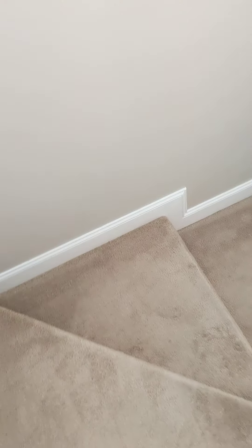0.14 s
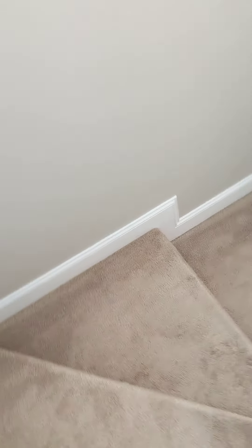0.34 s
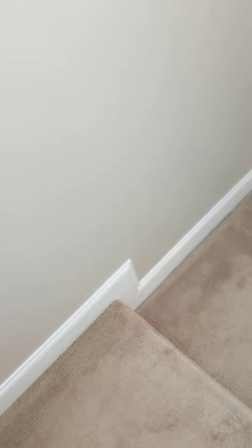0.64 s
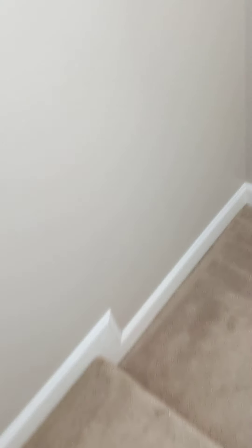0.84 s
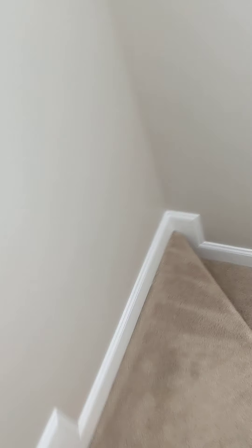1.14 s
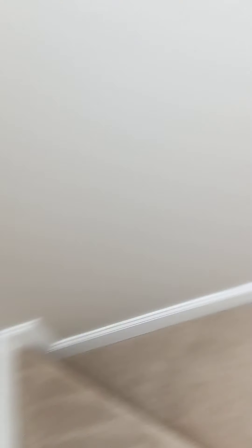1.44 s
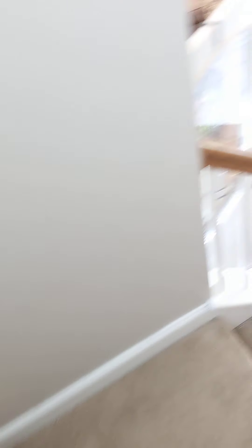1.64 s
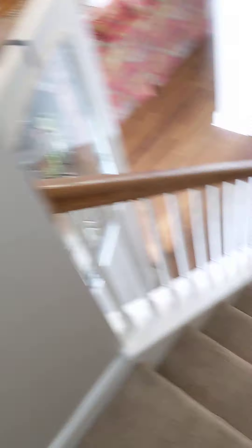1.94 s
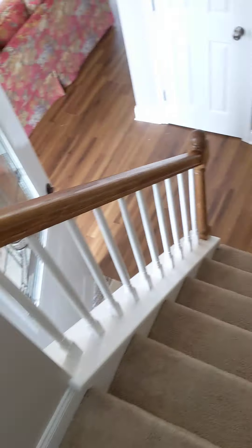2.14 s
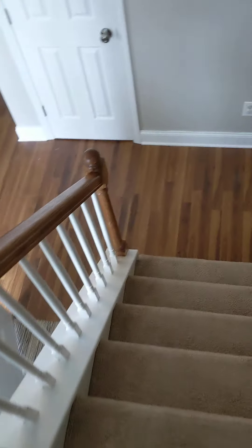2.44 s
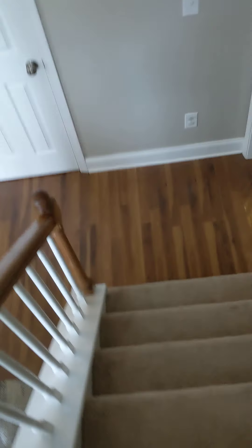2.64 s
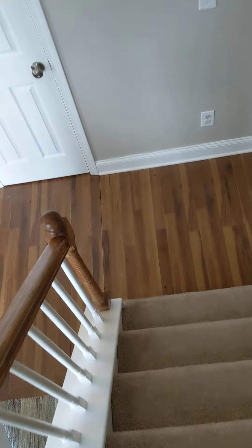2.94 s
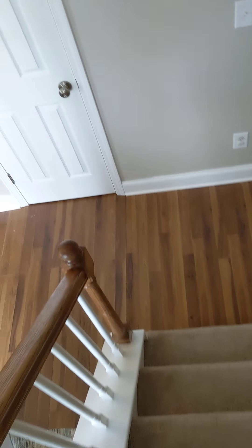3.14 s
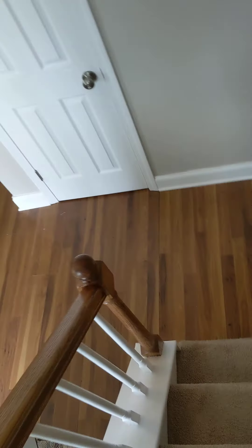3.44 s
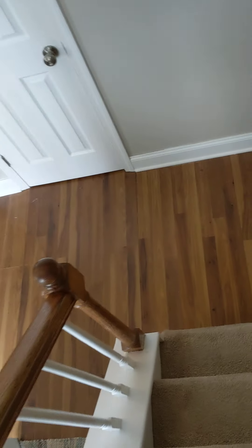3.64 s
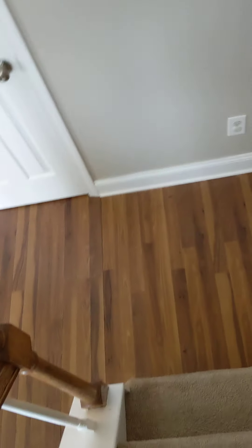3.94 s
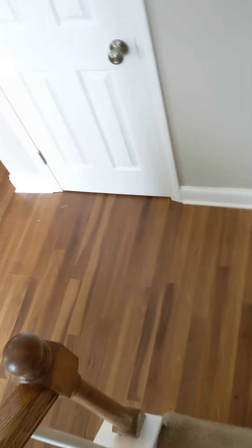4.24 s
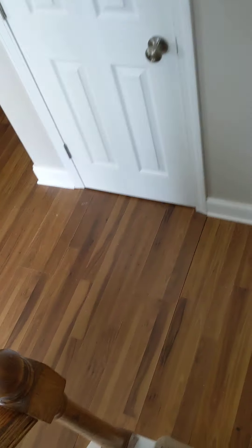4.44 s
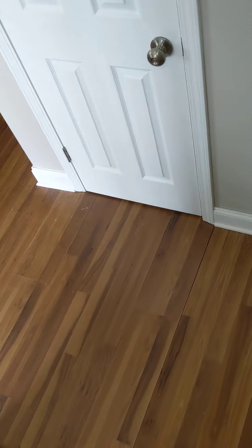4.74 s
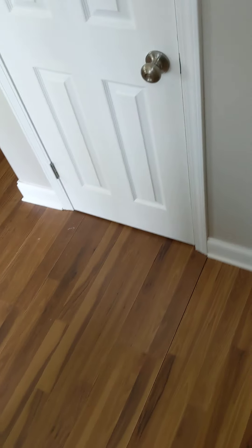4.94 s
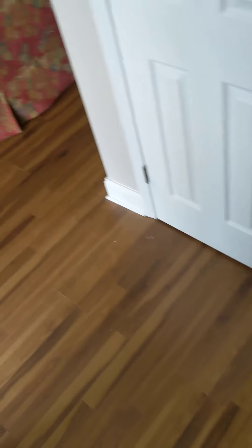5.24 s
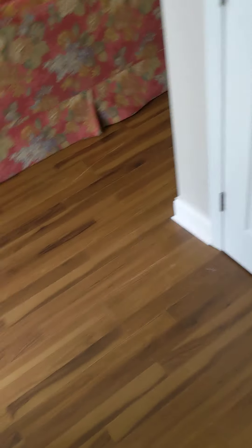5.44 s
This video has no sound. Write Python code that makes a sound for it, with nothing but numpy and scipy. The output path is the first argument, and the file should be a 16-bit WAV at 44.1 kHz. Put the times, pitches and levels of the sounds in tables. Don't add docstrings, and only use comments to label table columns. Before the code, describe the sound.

Uneven padded footfalls on a carpeted staircase, heard close from a small handheld stereo recorder. Low thuds shake the wooden frame while boards knock, rattle, tick and crack; feet crunch and brush the pile and trouser legs hiss past each other. The strongest step lands around 1.5 seconds, quieter ones follow, one bright crack interrupts, and a deeper thud comes last. Faint house hush and brief echoes from close walls.

```python
import sys
import numpy as np
from scipy import signal
from scipy.fft import rfft, irfft, next_fast_len
from scipy.io import wavfile

SR = 44100
rng = np.random.default_rng(int(sys.argv[2]) if len(sys.argv) > 2 else 0)


def natural_amplitude(level_db):
    exponent = np.asarray(level_db, float) / 20
    return 10 ** exponent


def store_pcm(level_fs):
    pcm = np.round(np.clip(level_fs, -1, 1) * 32767).astype(np.int16)
    wavfile.write(sys.argv[1], SR, np.atleast_2d(pcm).T)


N = 246735
PAD = next_fast_len(N + SR)
HZ = np.maximum(np.fft.rfftfreq(PAD, 1 / SR), 1)
PORTS_APART_HZ = 304
LEFT_LAG_S = 0.00018


def rms_one(x):
    return x / np.sqrt(np.mean(x ** 2) + 1e-20)


def peak_one(x):
    return x / np.max(np.abs(x))


def add(track, start_s, sound):
    at = round(start_s * SR)
    track[..., at:at + sound.shape[-1]] += sound[..., :N - at]


def panned(x, pan_db):
    return x * natural_amplitude([[pan_db / 2], [-pan_db / 2]])


def in_time(rows, peak_db, rise_db_s, fall_db_s):
    t = np.arange(N) / SR
    start, hold = np.transpose(rows)[:2, :, None]
    swell_db = rise_db_s * np.maximum(start - t, 0)
    decay_db = fall_db_s * np.maximum(t - start - hold, 0)
    return natural_amplitude(peak_db[:, None] - swell_db - decay_db)


def at_hz(points, hz):
    table_hz, table_db = np.transpose(points)
    return np.interp(np.log(hz), np.log(table_hz), table_db)


def colour(x, gain):
    return irfft(rfft(x, PAD) * gain, PAD)[..., :N]


def band_of(x, order, edges_hz):
    return signal.sosfilt(signal.butter(order, edges_hz, "band", fs=SR, output="sos"), x)


def drift(rate):
    knots = rng.standard_normal(int(N / SR * 200) + 2)
    return np.interp(np.arange(N) / SR * rate, np.arange(len(knots)), knots)


def resonance(x, hz, t60):
    shrink = natural_amplitude(-60 / (t60 * SR))
    turn = 2 * np.pi * hz / SR
    return signal.lfilter([0, np.sin(turn)], [1, -2 * shrink * np.cos(turn), shrink * shrink], x)


def ports(mid, side):
    apart = HZ ** 1.3397 / (HZ ** 1.332 + PORTS_APART_HZ ** 1.443) + 0.15
    side = colour(side, apart)
    return np.array([mid + side, mid - side])


def grainy(spectrum, per_s, spread_db, patchy_db):
    sizes = natural_amplitude(spread_db * np.minimum(rng.exponential(1, (2, N)), 5)) * rng.choice([-1, 1], (2, N))
    happens = rng.random((2, N)) < per_s / SR
    flicker = natural_amplitude(patchy_db * (drift(25) + drift(70)))
    mid, side = colour(sizes * happens * flicker, natural_amplitude(at_hz(spectrum, HZ)))
    return ports(rms_one(mid), rms_one(side))


# t60/s, level over the late tail/dB
EARLY_ECHOES = (0.17, 4.3)


def stairwell(x, noise, t60):
    t = np.arange(noise.shape[-1]) / SR
    early_t60, early_db = EARLY_ECHOES
    dying = natural_amplitude(-60 * t / t60) + natural_amplitude(early_db - 60 * t / early_t60)
    echoes = noise * np.abs(noise) * np.clip(t / 0.003, 0, 1) * dying
    return signal.fftconvolve(echoes / np.sqrt(np.sum(echoes[0] ** 2)), x[None])


def slips(count):
    t = np.arange(SR // 30) / SR
    rough = rng.standard_normal((count, len(t))) * np.exp(-t / 0.0016)
    return (t == 0) + rough, rng.standard_normal((count, 2, SR // 3))


def padded_blows(rows, pan_db):
    near, far = np.zeros((2, N)), np.zeros((2, N))
    t = np.arange(SR // 2) / SR
    delay_s = 0.002
    blow = np.exp(-t / 0.0001)
    for (start, db, hz, rattle_db), noise in zip(rows, rng.standard_normal((len(rows), 2, len(t)))):
        body = resonance(blow, hz, 17.0 / hz) - 0.45 * resonance(blow, 2.2 * hz, 4.0 / hz)
        add(near, start + delay_s, panned(natural_amplitude(db) * peak_one(body), pan_db))
        broad = rms_one(band_of(noise, 3, [0.5 * hz, 1.87 * hz]))
        t60 = 0.31 * (300 / hz) ** 0.45 * natural_amplitude(0.017 * (db + 38))
        dying = np.clip(t / 0.008, 0, 1) * natural_amplitude(-60 * t / np.clip(t60, 0.03, 0.8))
        add(far, start + delay_s, natural_amplitude(db + rattle_db) * broad * dying)
    return near, far


def brief_rings(rows):
    out = np.zeros(N)
    for start, db, hz, cycles in rows:
        t60 = cycles / hz
        push = signal.unit_impulse(int(t60 * SR))
        add(out, start, natural_amplitude(db) * peak_one(resonance(push, hz, t60)))
    return panned(out, 1.5)


# f/Hz, level/dB
HOUSE_COLOUR = [(12, -53), (20, 20), (45, -18), (168, -4.5), (388, -18.5), (472, -7), (849, -13.5),
                (1860, -22.5), (5530, -22.5), (6540, -28), (7520, -23), (8410, -33), (16000, -76)]


def quiet_house():
    return natural_amplitude(-60.5) * grainy(HOUSE_COLOUR, per_s=40000, spread_db=-1.0, patchy_db=1.5)


# f/Hz, level/dB
RUMBLE_COLOUR = [(15, 11), (30, 3), (45, 6.5), (65, -6.5), (100, -10), (150, -51), (260, -46.5)]
# f/Hz, level/dB
CRUNCH_COLOUR = [(71, -7.5), (120, 1), (179, -15.5), (264, -5.5), (372, -13.5), (423, -8), (735, -11.5),
                 (867, -13.5), (2000, -25.5), (2600, -101), (4400, -120)]
# f/Hz, level/dB
RUSTLE_COLOUR = [(710, -3.5), (1200, -6), (1640, -6), (3030, -1.5), (3430, -1), (4290, -6.5), (4810, -8),
                 (5480, -8.5), (7500, -11), (9750, -30), (16500, -120)]
# t/s, hold/s, crunch level/dB, rustle over crunch/dB
FOOT_ROLLS = [(0.0, 0.014, -49, -6), (0.243, 0.019, -47, -3), (0.416, 0.028, -57, 0),
              (0.591, 0.036, -43.5, -8), (1.015, 0.074, -45.5, -10), (1.264, 0.033, -62, -10),
              (1.537, 0.056, -38.5, -10), (1.916, 0.14, -46.5, -10.5), (2.14, 0.19, -62.5, -15),
              (2.624, 0.15, -53, -8), (2.914, 0.07, -68, 3.5), (3.24, 0.19, -55.5, -4.5),
              (3.674, 0.12, -61, -7), (3.867, 0.07, -54, -4.5), (4.08, 0.14, -58, -7),
              (4.383, 0.12, -52, -1.5), (4.647, 0.24, -71.5, 4), (4.942, 0.097, -52, -1.5),
              (5.146, 0.09, -56.5, -1.5), (5.411, 0.053, -46.5, -12)]


def rolling_feet():
    _, _, crunch_db, over_db = np.transpose(FOOT_ROLLS)
    rise_db_s, fall_db_s = 179, 157
    late = np.add(FOOT_ROLLS, [0.0073, 0, 0, 0])
    load = in_time(late, -50.5 + crunch_db - crunch_db.mean(), 350, 70).sum(0)
    crush = in_time(FOOT_ROLLS, crunch_db, rise_db_s, fall_db_s).sum(0) + natural_amplitude(-76)
    brush = in_time(FOOT_ROLLS, crunch_db + over_db, rise_db_s, fall_db_s).sum(0) + natural_amplitude(-71.5)
    rumble = load * grainy(RUMBLE_COLOUR, per_s=1500, spread_db=1.5, patchy_db=1.0)
    crunch = natural_amplitude(-3) * crush * grainy(CRUNCH_COLOUR, per_s=1500, spread_db=2.5, patchy_db=1.0)
    rustle = natural_amplitude(-4) * brush * grainy(RUSTLE_COLOUR, per_s=14000, spread_db=-4.0, patchy_db=1.5)
    return rumble + crunch + panned(rustle, 3)


# f/Hz, level/dB
SWISH_COLOUR = [(3530, -1.5), (6000, 5), (9500, 1.5), (10600, 2.5), (11500, -0.5), (13200, 4.5), (15000, 7),
                (16500, 5.5)]
# t/s, hold/s, level/dB, left over right/dB
LEG_SWINGS = [(0.0, 0.015, -61, -2), (0.232, 0.17, -57, 2), (0.572, 0.17, -54, 1), (0.99, 0.1, -63, 3),
              (1.49, 0.02, -64, 2), (1.58, 0.07, -61.5, 2), (1.858, 0.13, -67, -1), (2.584, 0.12, -64.5, 1),
              (2.842, 0.16, -65, 0), (3.184, 0.41, -68, 0), (3.866, 0.078, -58.5, 0),
              (4.075, 0.2, -63, 3.5), (4.358, 0.17, -54, 3.5), (4.79, 0.06, -66, 5), (4.88, 0.03, -64, 4),
              (4.28, 0.04, -67, 3.5), (2.21, 0.03, -71, 1), (4.95, 0.11, -54, 4), (5.117, 0.072, -63.5, 2),
              (5.332, 0.3, -63.5, 3)]


def trouser_swish():
    _, _, swish_db, pan_db = np.transpose(LEG_SWINGS)
    swing = natural_amplitude([pan_db / 2, -pan_db / 2]) @ in_time(LEG_SWINGS, swish_db, 179, 132)
    resting = natural_amplitude(-74.2)
    return (swing + resting) * grainy(SWISH_COLOUR, per_s=30000, spread_db=3.5, patchy_db=0.5)


# t/s, level/dB, f/Hz, echo share/dB
WOOD_CRACKS = [(0.015, -31, 980, -9), (0.0294, -31, 940, -24), (0.0597, -31.5, 1290, -12),
               (0.3782, -42.5, 1280, 4), (0.4638, -43.5, 1700, 1.5), (0.7026, -35.5, 830, -7),
               (0.8074, -36, 950, -14), (0.835, -29, 915, -31), (0.9305, -37, 970, 3),
               (0.9469, -34.5, 1190, 0.5), (1.0164, -42, 1080, 1), (1.1217, -54, 1000, -7),
               (1.4704, -44, 880, 3), (1.5205, -36, 1190, -6), (1.5598, -31, 870, 2.5),
               (1.965, -38, 920, -15), (1.9824, -52, 934, -15), (2.0228, -37.5, 1100, 1),
               (2.3, -56, 1040, 0), (3.2325, -47, 1380, 0), (3.308, -33, 1220, -7.5),
               (3.333, -28.5, 1600, -7), (3.3416, -36, 2360, -12), (3.3913, -41, 1460, -14),
               (3.6757, -50, 1020, -5), (3.7203, -49.5, 1150, -2), (3.8806, -43.5, 1290, 0.5),
               (3.95, -49, 900, -4), (4.2081, -49, 960, -2), (4.374, -42.5, 850, -2),
               (2.4294, -50.5, 660, -24),
    (2.296, -47.5, 1600, 7.5),
    (1, -53, 3800, -7),
    (3.263, -48, 2500, -8),
    (2.965, -50, 1570, 5.5),
    (0.015, -38, 1560, -5),
    (3.7293, -44.5, 9750, -10),
]


def wood_cracks():
    near, far = np.zeros((2, N)), np.zeros((2, N))
    rows = WOOD_CRACKS
    for (start, db, hz, echo_db), slip, noise in zip(rows, *slips(len(rows))):
        ring = resonance(np.diff(slip, prepend=0), hz, 10.5 / hz)
        wood = natural_amplitude(db) * peak_one(resonance(ring, 1.2 * hz, 2.2 / hz))
        add(near, start, panned(wood, -2.7))
        add(far, start, natural_amplitude(echo_db) * stairwell(wood, noise, t60=0.45))
    return near, far


# t/s, level/dB, f/Hz, rattle/dB
TOE_TAPS = [(0.014, -29.5, 620, -13.5), (0.029, -41, 870, -18), (0.056, -40.5, 620, -11),
            (0.284, -38.5, 700, -12), (0.385, -51, 1200, -3), (0.699, -63, 905, -25),
            (0.803, -41.5, 774, -1.5), (0.836, -34, 780, -4), (0.929, -35, 1000, -7.5),
            (1.116, -42, 614, -2), (1.224, -25.5, 613, -34), (1.227, -34.5, 416, -3),
            (1.373, -44.5, 550, -9), (1.878, -27.5, 387, -9.5), (2.023, -26, 398, -5.5),
            (2.299, -47, 584, -11.5), (2.429, -50.5, 477, -29), (2.963, -47.5, 587, -8.5),
            (3.33, -31.5, 493, -14), (3.419, -38.5, 466, -10.5), (3.95, -45, 940, -34),
            (4.134, -42, 640, -21), (4.203, -59, 473, -3), (4.411, -34, 500, -19), (4.53, -44, 553, -14),
            (4.664, -45.5, 466, -13), (5, -46, 435, -2), (5.149, -47, 560, -4), (5.506, -41, 557, -6)]


def toe_taps():
    return padded_blows(TOE_TAPS, pan_db=-6)


# f/Hz, level/dB
FIBRE_MODES = [(2900, -4), (4150, 4.5), (5550, -4), (9200, -18)]
# t/s, level/dB, echo share/dB
FIBRE_SNAPS = [(0.0295, -39, -2), (0.0615, -46, 7.5), (0.4647, -44, -3), (0.7027, -64, -10),
               (0.806, -46, 5), (0.8376, -34, 0), (0.9317, -24, 2.5), (0.95, -38, -1), (1.0177, -38, 6),
               (1.121, -37.5, 11), (1.225, -54.5, 17.5), (1.374, -41, 11.5), (1.5607, -51, 17),
               (1.9344, -57, 1), (1.966, -37.5, 5), (1.983, -39.5, 1), (2.024, -53, -9), (2.55, -59.5, 17),
               (2.9617, -61, 20), (3.2334, -51.5, 11), (3.263, -53, 12), (3.3095, -45.5, 7),
               (3.333, -30, 2), (3.7215, -53, 9), (3.8804, -48, 13.5), (3.342, -34, -5), (3.351, -42, -9),
               (1.521, -43, -6), (5.149, -44, 7.5), (5.5058, -49.5, 18.5)]


def fibre_snaps():
    near, far = np.zeros((2, N)), np.zeros((2, N))
    dull = peak_one(band_of(signal.unit_impulse(SR // 30), 4, [2200, 6200]))
    for (start, db, echo_db), slip, noise in zip(FIBRE_SNAPS, *slips(len(FIBRE_SNAPS))):
        rung = sum(natural_amplitude(mode_db) * resonance(slip, hz, 0.0041) for hz, mode_db in FIBRE_MODES)
        bright = band_of(slip, 2, [2000, 7500]) + 0.14 * np.diff(slip, prepend=0)
        snap = peak_one(peak_one(bright) + 0.76 * peak_one(rung))
        add(near, start, panned(natural_amplitude(db) * snap, 6))
        add(far, start, natural_amplitude(db + echo_db) * stairwell(dull, noise, t60=0.37))
    return near, far


# t/s, level/dB, f/Hz,
# ring/cycles
TREAD_JERKS = [(1.569, -34, 258, 9), (1.578, -26, 297, 13), (1.593, -31.5, 418, 6.4), (1.614, -36, 345, 8),
               (1.885, -30.5, 330, 5.3), (1.899, -30.5, 344, 8), (1.924, -35, 330, 8.7),
               (1.969, -34, 380, 6.8), (1.996, -31.5, 330, 8), (2.031, -28, 440, 7), (2.053, -29, 477, 11),
               (2.074, -31, 400, 9), (2.094, -33, 444, 10), (2.107, -36.5, 434, 13), (2.131, -39, 398, 10),
               (2.155, -42, 500, 11), (3.44, -43, 550, 8.3), (3.457, -43, 610, 5.2), (0.599, -33, 390, 9),
               (0.613, -32, 380, 11), (1.04, -40, 304, 6.9), (1.252, -42, 500, 10), (5.151, -39.5, 541, 40),
               (5.437, -42, 250, 5.5), (5.448, -30, 63, 4.5), (5.531, -35, 44.7, 5), (5.31, -45, 665, 28),
               (5.335, -46, 730, 27), (0.137, -50, 640, 35), (0.052, -41.5, 604, 30),
               (0.232, -35.5, 39.6, 3.2), (0.269, -37.5, 60, 6), (0.322, -40, 35, 4), (2.687, -36, 36, 5),
               (3.244, -37, 330, 10), (3.342, -37, 520, 7), (2.69, -48, 280, 16), (2.592, -44, 90, 3),
               (0.29, -43, 180, 20), (0.78, -50, 200, 12), (2.03, -33, 142, 13), (1.93, -36, 150, 10),
               (0.845, -37, 566, 28), (4.362, -36.5, 171, 5.5), (4.965, -40, 60, 5), (2.305, -50, 580, 15),
               (2.97, -54, 570, 22)]


def tread_jerks():
    return brief_rings(TREAD_JERKS)


# t/s, level/dB, f/Hz, ring/cycles
DRY_CLICKS = [(0.3772, -32, 1060, 5.8), (0.448, -41, 1800, 4), (1.472, -33, 720, 3.9),
              (1.5215, -26, 900, 4), (1.8785, -34, 1200, 4), (1.944, -48, 1400, 3), (2.026, -28, 1900, 4.4),
              (2.048, -35, 2300, 8), (2.285, -44, 1500, 3.7), (2.32, -53, 1300, 4.4),
              (3.233, -38, 1200, 5.3), (3.2635, -39, 2200, 3), (3.351, -40, 3500, 8),
              (3.951, -35, 770, 3.5), (4.055, -45, 1500, 4.4), (4.21, -46, 680, 3), (0.8365, -32, 4200, 9),
              (1.121, -44, 4000, 4), (0.9325, -26, 8200, 24), (0.9325, -22, 3000, 9),
              (0.933, -30, 4500, 16), (0.838, -38, 5400, 14), (0.098, -44, 1200, 6.2),
              (0.16, -45, 1500, 16), (5.21, -54, 10500, 10), (3.677, -45, 1000, 4), (2.6, -42, 1400, 4),
              (3.3335, -28, 2700, 10), (1.578, -32, 850, 8), (1.595, -31, 890, 8.7), (5.004, -40, 1140, 8),
              (1.54, -41, 2600, 6), (1.5625, -38, 3300, 6), (1.573, -38, 2300, 5), (1.58, -38, 2650, 7),
              (1.591, -40, 2200, 5), (1.597, -41, 3200, 6), (1.617, -40, 1500, 8), (2.027, -38, 2400, 5),
              (2.043, -42, 3300, 6), (2.094, -42, 1400, 5), (0.8065, -39, 4000, 12), (0.612, -44, 3300, 6),
              (3.265, -44, 1200, 4), (3.366, -45, 1600, 8)]


def dry_clicks():
    return brief_rings(DRY_CLICKS)


# t/s, level/dB, f/Hz, rise/ms, ring t60/s
FOOT_THUMPS = [(0.163, -35, 92, 9.4, 0.4), (0.519, -32, 83, 12, 0.42), (0.938, -37, 74, 7, 0.13),
               (0.661, -39, 32, 20, 0.44), (1.022, -29.5, 50, 14, 0.15), (1.232, -42.5, 92, 16, 0.57),
               (1.5035, -16, 54, 10, 0.34), (1.612, -30.5, 33, 12, 0.72), (1.883, -34.5, 90, 12, 0.2),
               (2.02, -29.5, 77, 12.7, 0.26), (2.43, -54, 77, 5.5, 0.16), (2.55, -49, 87.4, 7.9, 0.3),
               (2.61, -40, 43, 29, 0.3), (2.735, -43, 24, 12, 0.66), (3.189, -43, 48, 7.6, 0.19),
               (3.241, -33.5, 53, 16, 0.33), (3.559, -48, 55.6, 13, 0.65), (3.79, -45, 72, 11, 0.43),
               (4.322, -36, 51, 5.4, 0.48), (4.436, -38.5, 42, 7.7, 0.094), (4.906, -38.5, 78.3, 16, 0.56),
               (4.95, -43, 31, 17, 0.24), (5.131, -47.5, 68, 18, 0.15), (5.389, -25, 64, 13, 0.25)]


def foot_thumps():
    out = np.zeros(N)
    t = np.arange(SR // 2) / SR
    shudders = rng.standard_normal((len(FOOT_THUMPS), len(t)))
    for (start, db, hz, rise_ms, t60), shudder in zip(FOOT_THUMPS, shudders):
        envelope = (1 - np.exp(-(t / (rise_ms / 1000)) ** 2)) * natural_amplitude(-60 * t / t60)
        joists = rms_one(resonance(resonance(shudder, 1.8 * hz, 0.024), 1.8 * hz, 0.024))
        frame = np.sin(2 * np.pi * hz * t)
        add(out, start, natural_amplitude(db) * peak_one(envelope * (frame + 0.28 * joists)))
    return out


# t/s, level/dB, f/Hz, rattle/dB
BOARD_KNOCKS = [(0.171, -43.5, 202, -8), (0.23, -41, 186, -6.5), (0.526, -25, 292, -12),
                (0.574, -38, 308, -4), (0.944, -41.5, 134, -15.5), (1.012, -41, 202, -6),
                (1.464, -43.5, 220, 3), (1.524, -28, 277, -5.5), (1.559, -22, 258, -8),
                (1.608, -26, 295, -44), (1.94, -38.5, 326, 3.5), (2.432, -57, 195, -13),
                (2.546, -47, 213, -19), (3.197, -40, 120, -13), (3.234, -33, 339, -14.5),
                (3.805, -45.5, 216, -3), (3.882, -39, 243, -8.5), (4.112, -41.5, 227, -10),
                (4.359, -35.5, 223, -9), (4.528, -47, 217, -9), (4.666, -46, 248, -16),
                (4.903, -41, 125.4, -5), (4.907, -52.5, 240, -13), (5.397, -37.5, 133, -7.5),
                (5.403, -29, 209, -13)]


def board_knocks():
    return padded_blows(BOARD_KNOCKS, pan_db=0.5)


# t/s, hold/s, level/dB, f/Hz, width/octaves
PILE_SCUFFS = [(1.121, 0.04, -52.5, 3600, 1.45), (0.94, 0.026, -52, 3600, 1.2),
               (0.94, 0.02, -53, 4900, 0.97), (0.845, 0.013, -50, 3150, 0.57),
               (4.79, 0.48, -60.5, 3700, 0.6), (1.525, 0.075, -46.5, 870, 0.83),
               (1.62, 0.07, -60, 900, 0.57), (5.26, 0.13, -59, 734, 1.06), (1.9, 0.15, -67.5, 6300, 1.3),
               (1.375, 0.025, -60.5, 1360, 0.7), (0.35, 0.072, -59, 3200, 0.35),
               (2.026, 0.05, -57, 2200, 0.8), (5.3, 0.08, -62, 3600, 1.8), (5.27, 0.17, -61.5, 3300, 0.5),
               (2.2, 0.04, -70, 6000, 1.0), (1.562, 0.05, -55, 2700, 0.9), (1.374, 0.06, -62, 10500, 1.15),
               (2.552, 0.04, -69, 10000, 1.2), (2.01, 0.04, -70, 12500, 0.6)]


def pile_scuffs():
    out = np.zeros((2, N))
    grains = rng.standard_normal((len(PILE_SCUFFS), 2, SR)) ** 3
    gains = in_time(PILE_SCUFFS, np.transpose(PILE_SCUFFS)[2], 1500, 450)
    for (start, _, _, hz, octaves), grain, gain in zip(PILE_SCUFFS, grains, gains):
        edges_hz = hz * 2 ** (octaves * np.array([-0.5, 0.5]))
        rasp = rms_one(band_of(grain, 4, edges_hz))
        begin = start - 0.05
        loudness = gain[round(begin * SR):][:SR]
        add(out, begin, rasp[:, :len(loudness)] * loudness)
    return out


def scene():
    house, feet, swish = quiet_house(), rolling_feet(), trouser_swish()
    crack, crack_far = wood_cracks()
    tap, tap_far = toe_taps()
    snap, snap_far = fibre_snaps()
    rings = tread_jerks() + dry_clicks()
    thump = foot_thumps()
    knock, knock_far = board_knocks()
    echoes = ports(*(crack_far + tap_far + snap_far + knock_far))
    below = house + feet + swish + tap + rings + thump + knock + echoes + pile_scuffs()
    left_later = np.exp(-2j * np.pi * HZ * [[LEFT_LAG_S], [0]])
    return crack + snap + colour(below, left_later)


# f/Hz, width/Hz, lift/dB
HOUSING_MODES = [(4260, 370, -8), (5575, 410, -2), (7530, 120, -2), (9570, 1040, 1), (11440, 350, 6.5),
                 (14000, 130, -65), (16100, 520, -37)]
# f/Hz, width/Hz, depth/dB
GRIP_SHADOW = (1890, 164, -1.5)


def housing_and_hand():
    gain = 1
    for hz, width, db in HOUSING_MODES:
        gain = gain + natural_amplitude(db) * 1j * HZ * width / (hz ** 2 - HZ ** 2 + 1j * HZ * width)
    hz, width, db = GRIP_SHADOW
    return gain * natural_amplitude(db * np.exp(-((HZ - hz) / width) ** 2))


def band_limit(x):
    return signal.sosfilt(signal.butter(12, 16840, fs=SR, output="sos"), x)


def record(dry):
    treble_db = 3.4 * HZ ** 4 / (HZ ** 4 + 11500 ** 4)
    left_brighter = natural_amplitude(treble_db * [[0.5], [-0.5]])
    below_top = HZ < 15850
    heard = colour(panned(dry, 0.8), housing_and_hand() * below_top * left_brighter)
    return band_limit(heard)


dry = scene()
out = record(dry)
store_pcm(out)
```